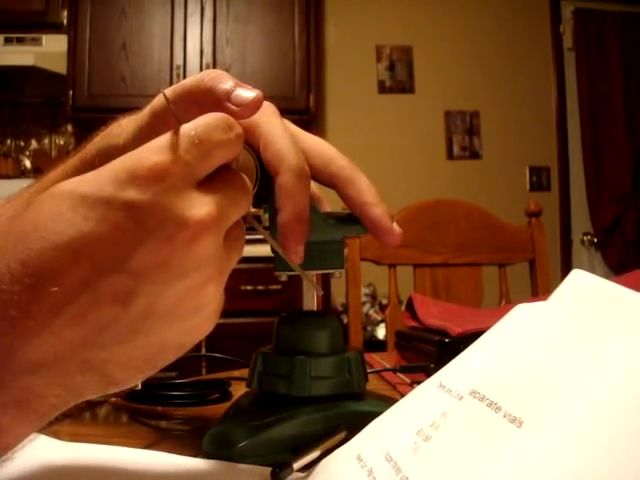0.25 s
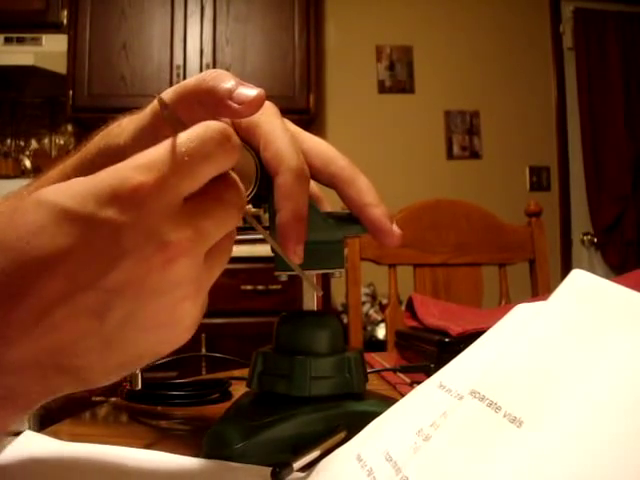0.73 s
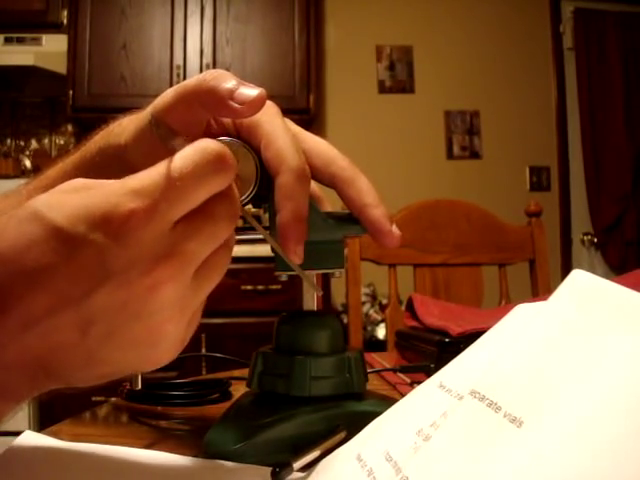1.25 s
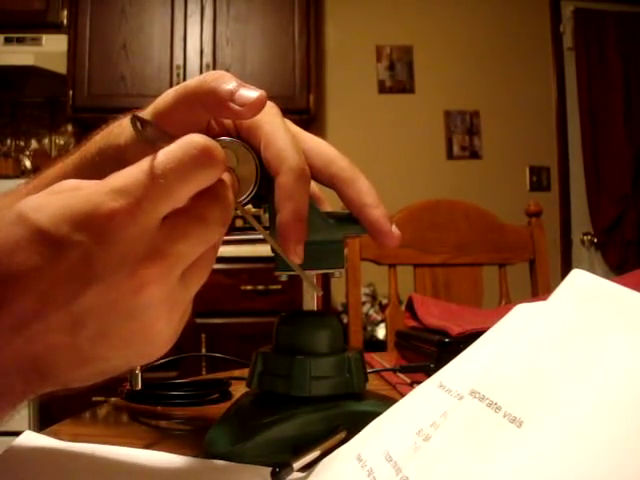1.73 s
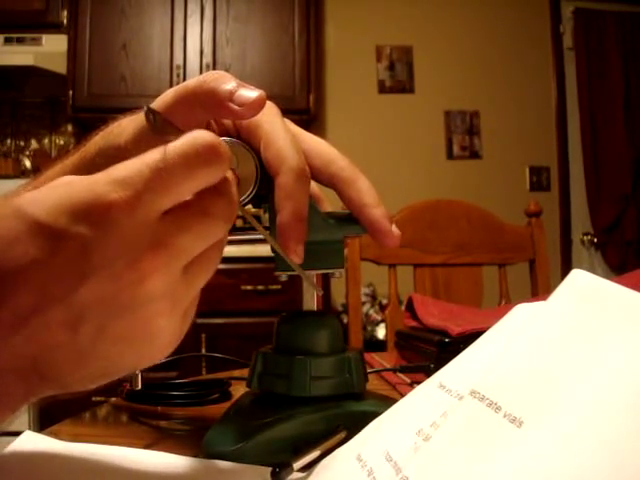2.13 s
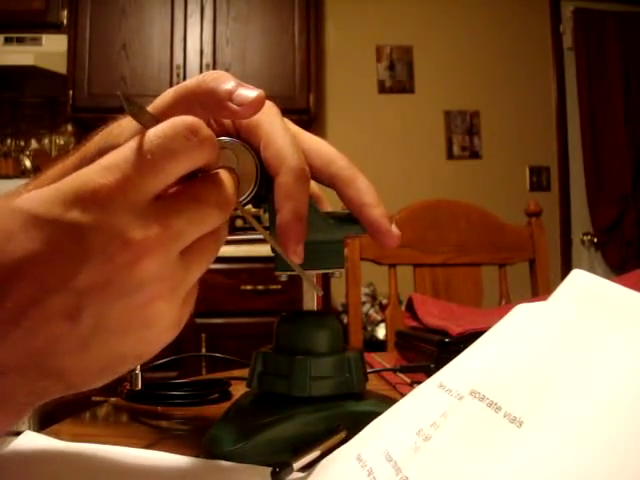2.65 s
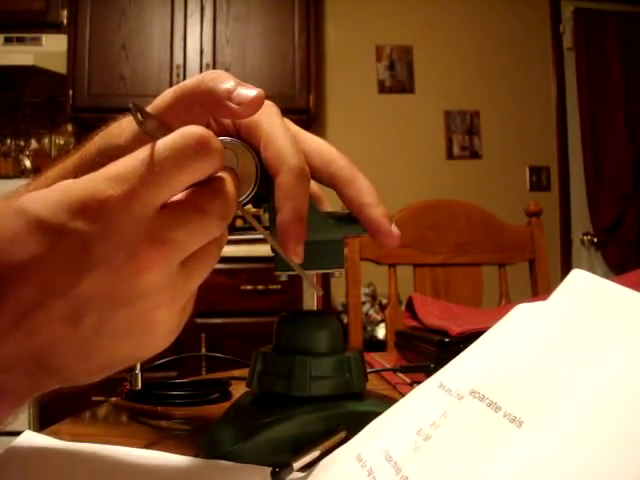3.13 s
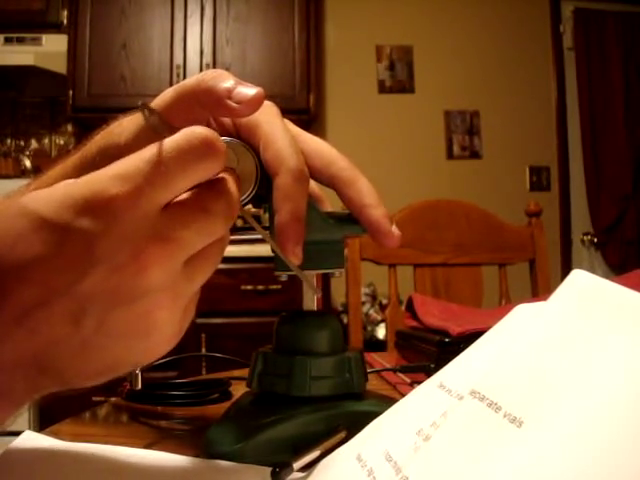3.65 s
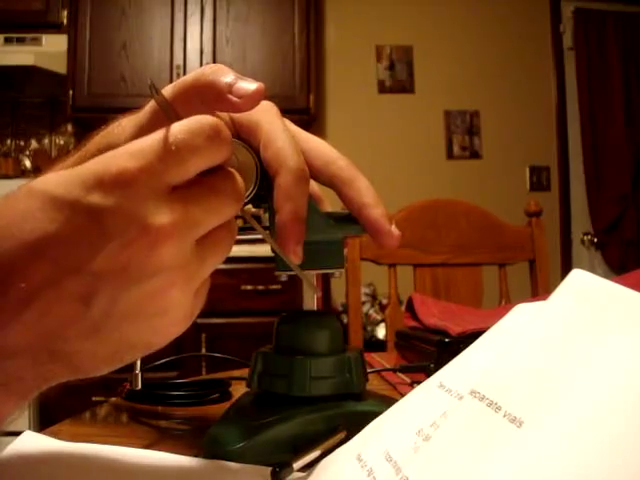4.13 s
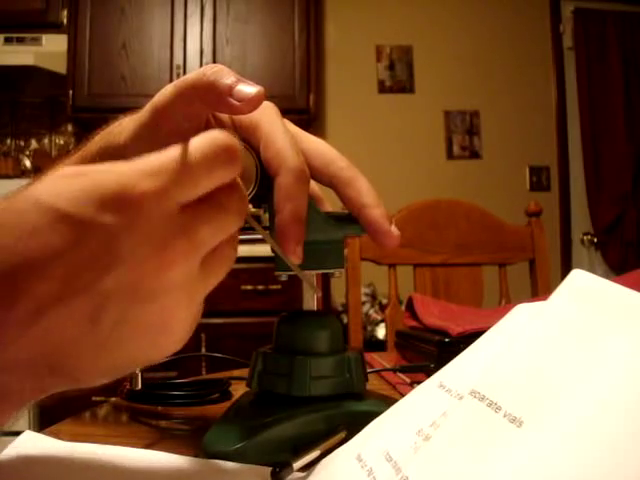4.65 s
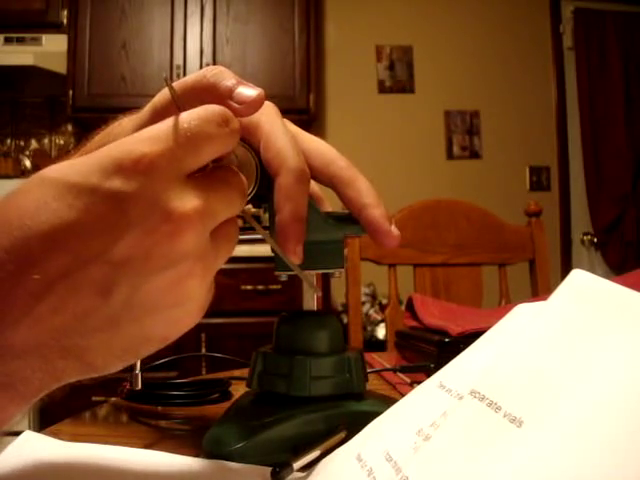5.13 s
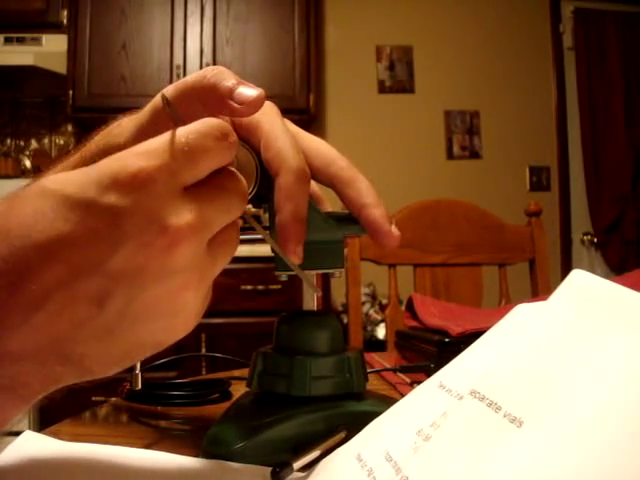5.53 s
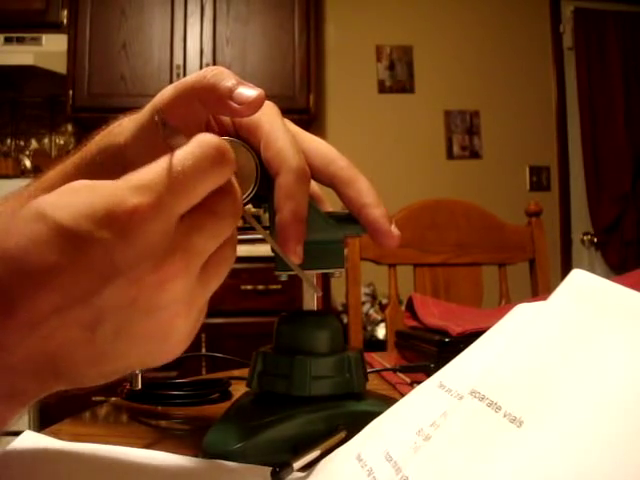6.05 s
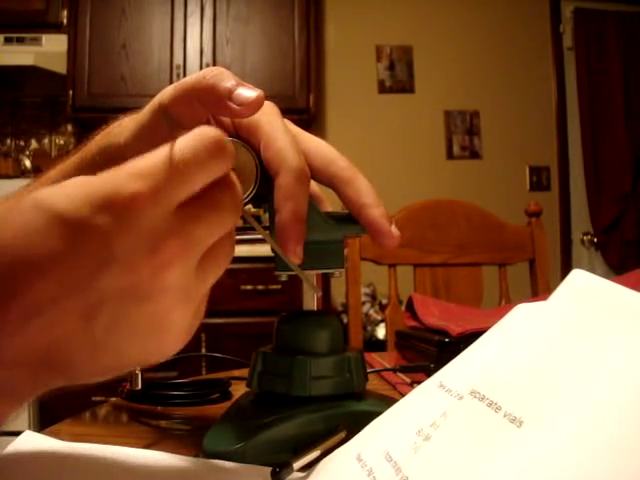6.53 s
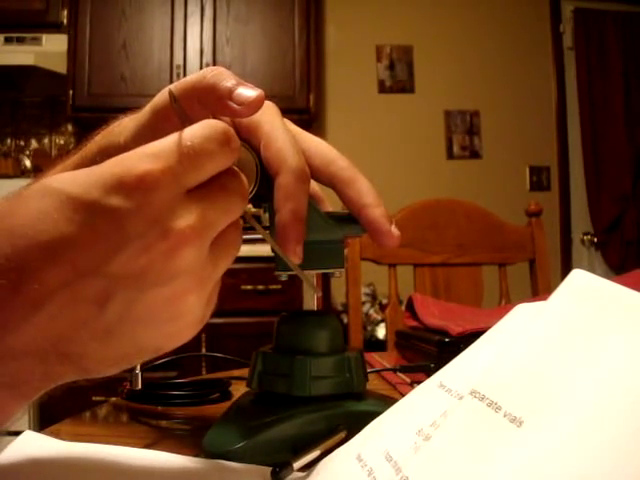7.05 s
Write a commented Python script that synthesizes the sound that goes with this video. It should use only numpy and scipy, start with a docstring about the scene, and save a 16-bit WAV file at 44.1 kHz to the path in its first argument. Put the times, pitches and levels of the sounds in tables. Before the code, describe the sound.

Light metallic ticks and sharp snaps of a lock being picked in a vise, with a low fan hum and faint clock behind.

```python
"""Picking a lock in a vise

A pick works the pins of a lock clamped in a vise, close by in a small kitchen. Light ticks come as
it probes; three times a pin snaps free, and twice the plug then turns and knocks the vise. Each
contact rings the metal parts. Across the room a wall clock steps once a second, and a fan motor
hums over its rush of air."""
import sys
import numpy as np
from scipy import signal
from scipy.fft import rfft, irfft, next_fast_len
from scipy.io import wavfile
from scipy.ndimage import map_coordinates

SR = 44100
rng = np.random.default_rng(int(sys.argv[2]) if len(sys.argv) > 2 else 0)


def wav_record(signal):
    """Record a signal, one row per channel, as 16-bit PCM in the file named by sys.argv[1]."""
    frames = np.transpose(np.atleast_2d(signal))
    bounded = np.clip(frames, -1, 1)
    # unit amplitude maps onto the largest positive 16-bit level
    quanta = np.round(bounded * 32767).astype(np.int16)
    wavfile.write(sys.argv[1], SR, quanta)


N = 321930
TOP_HZ = 10120

# Modes of the lock's parts and tools. Each row: frequency in Hz, width in Hz, gain in dB.
VISE = [(144.3, 20, 14.5), (237, 31, 6.3), (337, 53, 6), (492, 123, 1.5), (866, 110, 2)]
BODY = [(1574, 115, 0), (1984, 100, -7.5), (2590, 155, -2.5), (3040, 100, -2)]
PLUG = [(553, 130, 4), (730, 100, -0.5), (1087, 114, 1), (1417, 110, 0.5), (1550, 110, 1.5), (2040, 56, 3),
        (2145, 48, 3.5)]
PIN = [(7700, 300, -8.5), (8130, 60, 3), (8270, 83, 0.5), (9730, 350, -7), (9910, 100, -2.5)]
WRENCH = [(1140, 36, -3), (1354, 22, 8), (2200, 60, -10), (3238, 45, -0.5), (4000, 31, -5), (4320, 35, -3),
          (5730, 400, -13), (8970, 870, -12.5)]
TIP = [(3270, 250, 1), (3450, 240, 4), (3700, 300, 1)]
SHAFT = [(4140, 130, -5.5), (4960, 200, -6.5), (5400, 200, -6.5), (6260, 200, -9), (6620, 160, -12.5),
         (7200, 500, -18)]
# First echoes off table, cupboards and walls. Each row: delay in seconds, gain in dB.
ECHOES = [(0.0107, -14), (0.0148, -15), (0.0254, -20.5), (0.0345, -21)]
# Reverberation. Each row: frequency in Hz, level over the direct sound in dB.
ROOM_GAIN = [(150, -0.4), (500, 2.5), (1500, -5), (2500, -0.5), (3700, -10.5), (6000, -6), (9000, -7.5)]

def contact(parts, grit, t60_s):
    """One contact rings each (modes, dB) part; near surfaces echo it and the room answers."""
    metal = lambda f: sum(amp(db) * ring(modes, f) for modes, db in parts)
    surfaces = lambda f: sum(amp(db) * np.exp(-2j * np.pi * f * lag_s) for lag_s, db in ECHOES)
    click = filtered(blow(grit, t60_s), lambda f: metal(f) * bass_cut(f, corner_hz=118))
    reverb = filtered(room(click, onset_s=0.003), lambda f: amp(along(ROOM_GAIN, f)))
    return click + filtered(click, surfaces) + reverb

def pick_rings(hz, tip_db, shaft_db, nominal_hz=3470):
    """The pick's modes shift together as its free length changes."""
    shifted = lambda modes: [(centre * hz / nominal_hz, width, db) for centre, width, db in modes]
    return [(shifted(TIP), tip_db), (shifted(SHAFT), shaft_db)]

# Parts rung alike by every snap. Each row: modes, gain in dB.
SNAP_RINGS = [(VISE, -12.5), (PLUG, -7)]
# Each row: start in seconds, level in dB, relative tip, pin, wrench and body in dB, pick pitch in Hz.
SNAPS = [(-.025, 1, -2, 1.5, -15, 0, 3420), (1.5664, 1.5, -6, -14, 3.5, -1, 3480),
         (1.5687, -9.5, -4, -17, -6, 8.5, 3420), (1.9859, -5, -1, -4, -7, -2, 3600),
         (1.9888, -7, 5, -2, -5, 0, 3650), (3.3904, 1.5, 6, 4, -4, -4, 3430),
         (3.3917, 3.5, 2, 4, -10, 3.5, 3480)]

def pin_snaps():
    """Under the wrench's load, pins snap free with a sharp click."""
    track = np.zeros(N)
    for start_s, db, tip_db, pin_db, wrench_db, body_db, pick_hz in SNAPS:
        parts = SNAP_RINGS + pick_rings(pick_hz, tip_db, shaft_db=1)
        parts += [(PIN, pin_db), (WRENCH, wrench_db), (BODY, body_db)]
        add(track, amp(db) * contact(parts, grit=0.38, t60_s=0.0074), start_s)
    return track

# Parts rung alike by every knock. Each row: modes, gain in dB.
KNOCK_RINGS = [(PLUG, 0.0), (BODY, -12.5), (TIP, -6.5), (SHAFT, -7), (PIN, -27), (WRENCH, -27)]
# Each row: start in seconds, level in dB, relative vise thud in dB, treble cutoff in Hz.
KNOCKS = [(1.9918, 4.5, -8.5, 8000), (2.0005, 3.5, -4, 4300), (2.005, -6, 1, 2000),
          (2.0157, -5.5, 2.5, 4200), (3.3943, -0.5, 3.5, 3000), (3.4145, -9.5, 6.5, 4000),
          (3.4225, -13, 5, 2500)]

def plug_knocks():
    """The plug turns against its stop and the vise thuds."""
    track = np.zeros(N)
    for start_s, db, vise_db, cutoff_hz in KNOCKS:
        knock = contact(KNOCK_RINGS + [(VISE, vise_db)], grit=0.37, t60_s=0.013)
        add(track, amp(db) * filtered(knock, lambda f: treble_cut(f, cutoff_hz)), start_s)
    return track

# Parts rung alike by every touch. Each row: modes, gain in dB.
TOUCH_RINGS = [(PIN, -5.5), (WRENCH, -1)]
# Each row: start in seconds, level in dB, relative tip, plug and body in dB, pick pitch in Hz.
TOUCHES = [(0.4406, -20, 7, 3, 3, 3470), (1.513, -16, 1, -10, -5, 3470), (1.768, -20, 3, -6, -3, 3470),
           (1.8797, -17, 13, -6, -6, 3420), (1.9734, -10.5, 4.5, 1, -2, 3590),
           (2.3369, -14.5, -6, 3, 3, 3470), (2.613, -20, 6, 0, 0, 3430), (4.428, -13, 2, -1, 0, 3950),
           (5.628, -20, 5, -4, -2, 3550), (6.2973, -19, 4, -6, -3, 3470), (6.336, -22, 5, -4, -3, 3470),
           (6.599, -22, 5, 1, 3, 3250), (6.604, -22.5, -3, 6, 0, 3500), (6.6330, -12.5, -3, -7, -6, 3300),
           (6.6377, -13, -7, -2, -8, 3280), (6.648, -26, -8, 9, 0, 3470), (7.056, -21, -6, 3, 10, 3400)]

def pick_touches():
    """The pick probes the pins with light sliding touches."""
    track = np.zeros(N)
    for start_s, db, tip_db, plug_db, body_db, pick_hz in TOUCHES:
        parts = TOUCH_RINGS + pick_rings(pick_hz, tip_db, shaft_db=2.5)
        parts += [(PLUG, plug_db), (BODY, body_db)]
        add(track, amp(db) * contact(parts, grit=0.74, t60_s=0.022), start_s)
    return track

# Modes of the plastic case. Each row: frequency in Hz, width in Hz, gain in dB.
CLOCK_CASE = [(746, 80, -6.5), (1150, 130, -7.5), (2275, 160, -3), (3230, 1100, -18), (4450, 145, -6.5),
              (4780, 170, -13.5), (5300, 540, -16), (5980, 140, -13), (6440, 330, -11), (7200, 1400, -18.5)]
# Loudness curve of the steps. Each row: time in seconds, level in dB.
CLOCK_LEVEL = [(3.2, 1.5), (6.0, -5), (7.2, -3.5)]
# Strokes of one step. Each row: offset in seconds, relative level in dB.
GEAR_RATTLE = [(-.015, -7), (0.001, -2.5), (0.013, -6), (0.038, -3.8)]

def wall_clock(first_s=0.2, period_s=0.9995):
    """The gears take up slack, jump, rebound and settle; from afar mostly their echo arrives."""
    track = np.zeros(N)
    for step_s in np.arange(first_s, N / SR, period_s):
        step_db = np.interp(step_s, *np.transpose(CLOCK_LEVEL))
        for offset_s, stroke_db in GEAR_RATTLE:
            tick = filtered(blow(grit=0.8, t60_s=0.045), lambda f: ring(CLOCK_CASE, f))
            distant = 0.15 * tick + room(tick, onset_s=0.0017)
            add(track, amp(step_db + stroke_db) * distant, step_s + offset_s)
    return track

# Motor lines. Each row: multiple of the slot tone, multiple of the magnetic pull.
HUM_ORDERS = [(-1, 2), (0, 1), (1, 0), (-1, 3), (0, 2), (1, 1), (2, 0), (-1, 4), (0, 3), (1, 2), (0, 4)]
# Each entry: rms level of the matching line in dB.
HUM_DB = [-78.5, -60, -55, -63.5, -69, -57.5, -61, -66, -70.5, -76.5, -69]

def fan_motor(slot_hz=149.14, pull_hz=120, waver_db=0.6, drift_rad=0.057):
    """The rotor's slot tone beats with the magnetic pull of the mains; each line wavers slightly."""
    t = np.arange(N) / SR
    hum = np.zeros(N)
    for (slot, pull), db in zip(HUM_ORDERS, HUM_DB):
        hz = slot * slot_hz + pull * pull_hz
        phase = 2 * np.pi * (hz * t + rng.random()) + drift_rad * wobble(2.6)
        hum += amp(db + waver_db * wobble(2.98)) * np.sqrt(2) * np.sin(phase)
    return hum

# Air spectrum. Each row: frequency in Hz, relative density in dB.
AIR_SPECTRUM = [(25, -23.5), (70, -17.5), (105, -14), (135, -2.5), (180, -4), (240, -1.5), (350, 0),
                (700, -2), (1500, -7.5), (2700, -11.5), (4500, -15), (8000, -18), (10000, -21)]

def fan_air(level_db=-49.5, waver_db=0.24):
    """The fan moves air with an even, broad rush."""
    rush = filtered(rng.standard_normal(N), lambda f: amp(along(AIR_SPECTRUM, f)) * (f < TOP_HZ))
    rush /= np.sqrt(np.mean(rush ** 2))
    return amp(level_db + waver_db * wobble(4.65)) * rush

# Room decay. Each row: frequency in Hz, time to fall 60 dB in seconds.
ROOM_T60 = [(150, 0.28), (1000, 0.42), (4000, 0.39), (10000, 0.45)]

def room(x, onset_s):
    """The kitchen's reverberation builds up briefly and dies soonest in the bass."""
    hz, t, spectra = signal.stft(rng.standard_normal(len(x)), SR, nperseg=256)
    decay = amp(-60 * t / along(ROOM_T60, hz)[:, None])
    tail = signal.istft(spectra * decay, SR, nperseg=256)[1]
    tail *= 1 - np.exp(-(np.arange(len(tail)) / SR / onset_s) ** 2)
    return signal.fftconvolve(x, tail / np.linalg.norm(tail))[:len(x)]

def blow(grit, t60_s, size=12000):
    """A push of unit energy: one spike, then a brief rasp of surfaces sliding."""
    rasp = rng.standard_normal(size) * amp(-60 * np.arange(size) / SR / t60_s)
    force = grit * rasp / np.linalg.norm(rasp)
    force[0] += 1
    return force / np.linalg.norm(force)

def ring(modes, f):
    """Causal response of damped resonances, alternating in sign."""
    return sum((-1) ** k * amp(db) * 1j * f * width / (hz * hz - f * f + 1j * f * width)
               for k, (hz, width, db) in enumerate(modes))

def bass_cut(f, corner_hz):
    """Small parts radiate little below the corner."""
    s = 1j * f / corner_hz
    return s * s / (s * s + np.sqrt(2) * s + 1)

def treble_cut(f, corner_hz):
    """A soft contact excites little above the corner."""
    s = 1j * f / corner_hz
    return 1 / (s * s + np.sqrt(2) * s + 1)

def filtered(x, response):
    """Apply a complex frequency response."""
    size = next_fast_len(len(x) + 2048, real=True)
    return irfft(rfft(x, size) * response(np.fft.rfftfreq(size, 1 / SR)), size)[:len(x)]

def amp(db):
    return 10 ** (np.asarray(db) / 20)

def along(points, hz):
    """Interpolate (Hz, value) points on a log axis."""
    knots_hz, values = np.transpose(points)
    return np.interp(np.log(hz + 1), np.log(knots_hz + 1), values)

def wobble(rate_hz):
    """A smooth random curve, rate_hz knots a second."""
    knots = rng.standard_normal(int(N * rate_hz / SR) + 4)
    return map_coordinates(knots, [np.arange(N) * rate_hz / SR])

def add(track, sound, start_s):
    """Mix a sound in, trimmed to the track."""
    start = round(start_s * SR)
    part = sound[max(-start, 0):N - start]
    track[max(start, 0):][:len(part)] += part

def scene():
    """Lock work over fan and clock, in mono."""
    background = fan_motor() + fan_air() + wall_clock()
    return (background + pick_touches() + pin_snaps() + plug_knocks())[None]

def record(dry):
    """A steep low-pass at TOP_HZ, its edge 150 Hz wide."""
    low_pass = lambda f: np.clip((TOP_HZ - f) / 150 + 0.5, 0, 1)
    return np.array([filtered(x, low_pass) for x in dry])

dry = scene()
out = record(dry)
wav_record(out)
```